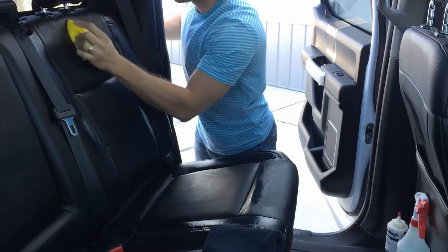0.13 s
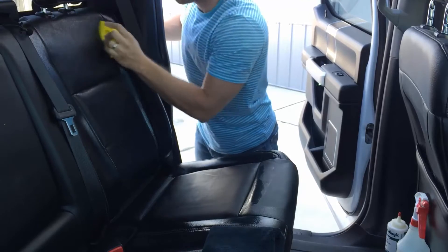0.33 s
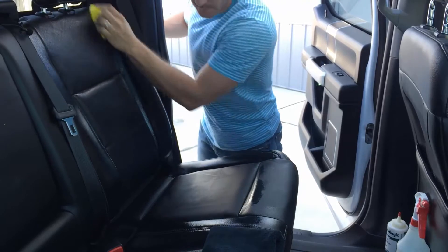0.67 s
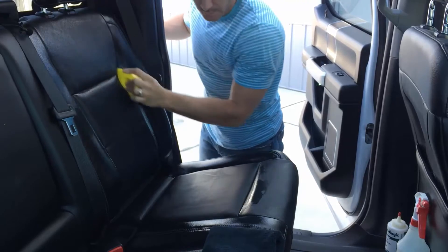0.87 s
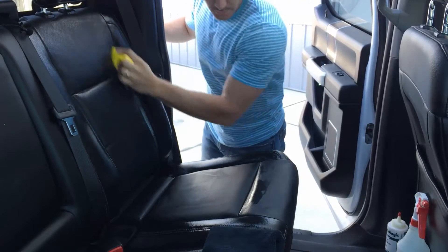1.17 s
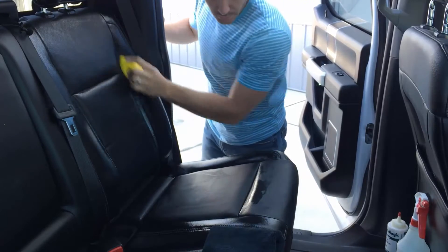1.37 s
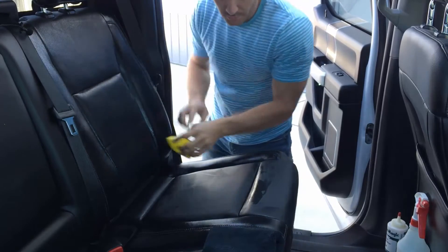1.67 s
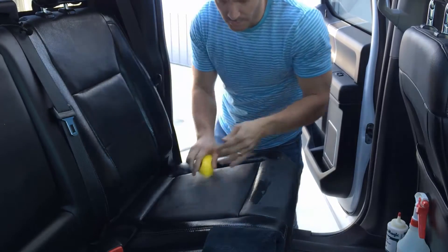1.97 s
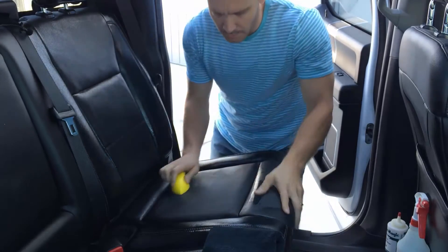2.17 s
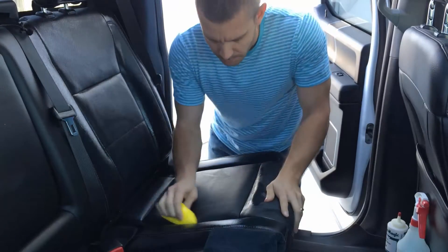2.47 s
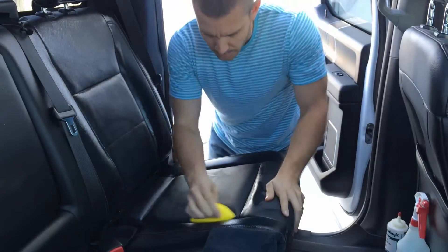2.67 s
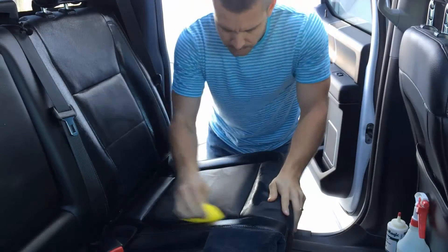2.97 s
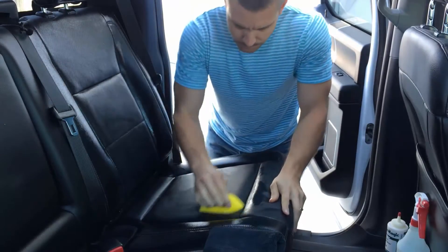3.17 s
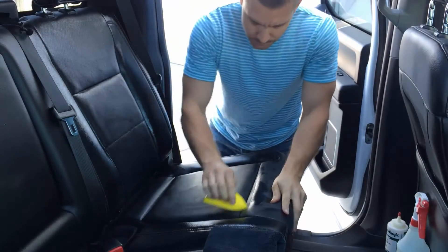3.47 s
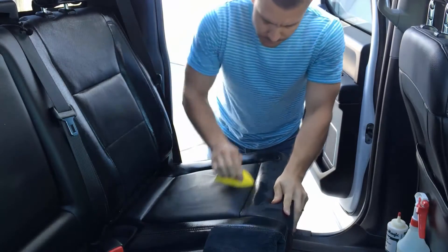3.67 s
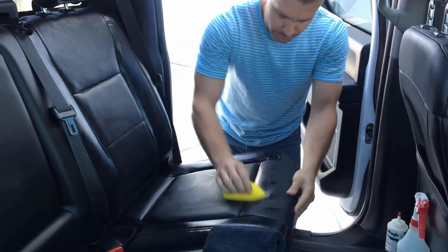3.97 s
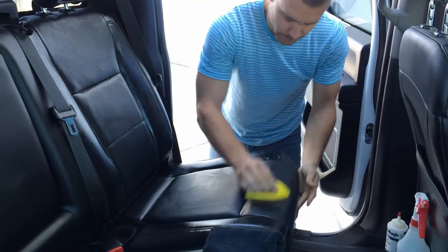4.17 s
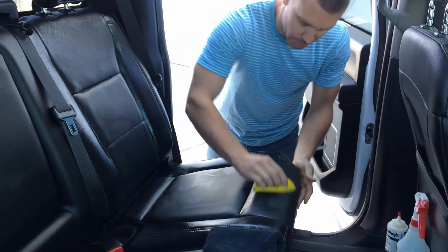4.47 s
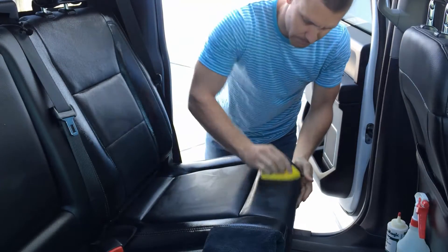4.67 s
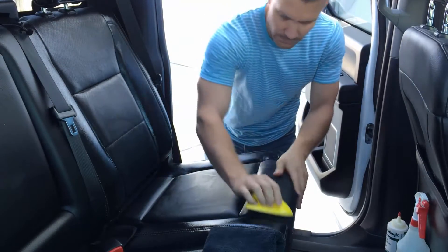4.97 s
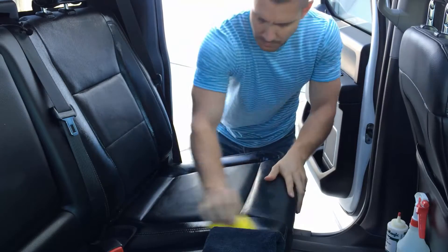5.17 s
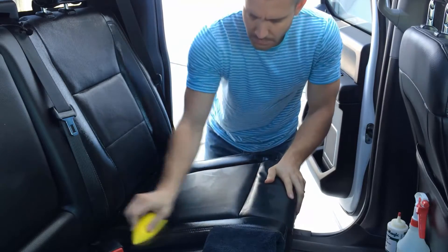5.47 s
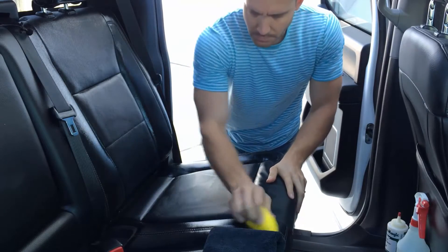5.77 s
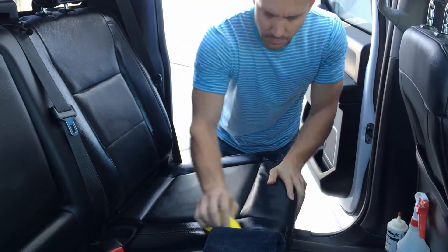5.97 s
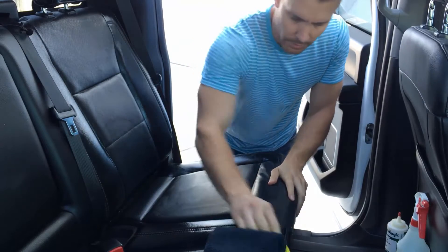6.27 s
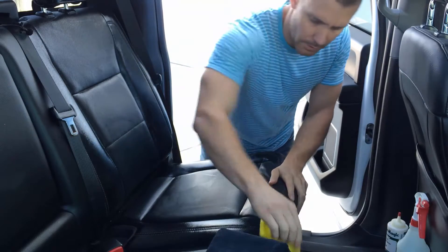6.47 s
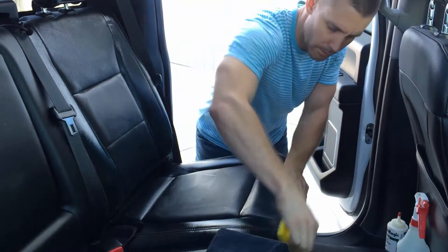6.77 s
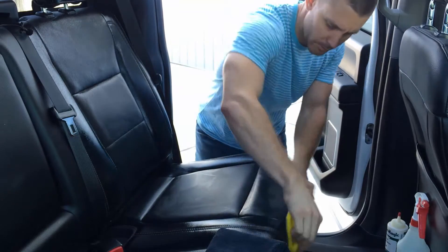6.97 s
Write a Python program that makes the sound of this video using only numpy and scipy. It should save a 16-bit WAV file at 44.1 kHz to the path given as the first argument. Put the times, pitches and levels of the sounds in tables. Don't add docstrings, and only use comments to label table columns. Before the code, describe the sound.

From 0 s a brush scrubs wet leather very close, bright and scratchy, dense bristle hiss over a soft padded rub. A solid thump and low rumble come at 0.1 s; strokes briefly stop at 0.47, 0.65, 1.08 and 1.3 s. Light trim taps tick near 0.55 and 1.2 s, then a loud knock cluster strikes at 1.44-1.51 s with a short groan. Brushing fades from 1.65 to 2.0 s, leaving faint bristle flicks. It resumes on the cushion, less crisp, with a heavy body rumble and tap at 2.2 s, and regular strokes until 5 s. A coarse, falling scrape drags over a seam at 4.3-4.6 s; a low moan sounds around 4 s. From 5 to 7 s strokes become short and wet along the edge, with hollow palm-pressed rubbing, faint groans near 5.6 s and dull knocks at 5.97 and 6.36 s. Dry cabin, faint air.

```python
import sys
import numpy as np
from scipy import signal
from scipy.fft import rfft, irfft
from scipy.io import wavfile
from scipy.ndimage import uniform_filter1d

SR = 44100
rng = np.random.default_rng(int(sys.argv[2]) if len(sys.argv) > 2 else 0)


def undo_db(level):
    steps = np.asarray(level, float) / 20
    return 10 ** steps


def dump(signal):
    limited = np.clip(np.atleast_2d(signal).T, -1, 1)
    pcm = np.round(limited * 32767).astype(np.int16)
    wavfile.write(sys.argv[1], SR, pcm)


N = 313992

# (frequency [Hz], level [dB per Hz])
RUB_COLOUR = [(1200, -61), (2100, -6.5), (2600, 5.5), (3700, 1.5), (4500, -11), (7000, -41)]
TIPS_COLOUR = [(4000, -29), (6000, -15.5), (7200, -7.5), (8500, -2.5), (10500, -1.5), (13000, 1.5),
               (14500, -5.5), (16000, -16)]
FILM_COLOUR = [(2500, -43), (3900, -6.5), (4500, -2), (5500, -1.5), (6500, -7.5), (8000, -10.5),
               (12000, -24)]
PAD_COLOUR = [(100, -2), (250, 0.5), (500, 0), (900, -0.5), (1500, -1.5), (2000, -1), (2600, -13.5),
              (5000, -92)]
# (frequency [Hz], level [dB per Hz])
HOLLOW_COLOUR = [(450, -28), (850, -1.5), (1600, 0.5), (2300, -3), (3500, -23)]
# (frequency [Hz], width [Hz], lift [dB])
BACK_MODES = [(582, 14, 6), (784, 25, -8.5), (1187, 11, 5), (1540, 43, 5), (1700, 55, 3.5), (2140, 23, 3),
              (2700, 100, -1.5), (3360, 51, 3), (3850, 140, 0.5)]
# (start [s], fastest [s], pressure [dB], bristle tips [dB], wet film [dB])
BACKREST_STROKES = [(0., 0.006, -45, 8, 5), (0.075, 0.093, -52, 9, 0), (0.159, 0.307, -47, 6, -5),
                    (0.493, 0.498, -46.5, 5.5, 0.5), (0.648, 0.792, -48, 7, -1),
                    (0.935, 1.005, -54, 5.5, 1.5), (1.068, 1.2, -46.5, 4, -1), (1.297, 1.416, -49, 6, -0.5),
                    (1.647, 1.7, -58.5, -8, -6), (1.764, 1.81, -63, -6, -9), (1.89, 1.95, -66.5, -10, -14)]
CUSHION_STROKES = [(2.007, 2.035, -55, 3.5, -2), (2.11, 2.25, -52.5, 5.5, -3), (2.283, 2.435, -47.5, 4, -3),
                   (2.518, 2.65, -47, 0, -3.5), (2.74, 2.828, -50.5, 3, -1), (2.934, 3.004, -46, -0.5, -4),
                   (3.094, 3.235, -48, -2, -4), (3.35, 3.426, -49.5, -1.5, -5),
                   (3.55, 3.692, -49.5, 1, -1.5), (3.787, 3.957, -48.5, 0.5, -2.5),
                   (4.144, 4.253, -49.5, -0.5, -5.5), (4.39, 4.493, -43.5, -2, -4),
                   (4.563, 4.68, -54.5, -1.5, -8.5), (4.755, 4.923, -52, 1.5, -5)]
EDGE_STROKES = [(5.048, 5.17, -46, -2.5, 4), (5.19, 5.295, -43.5, 0, 1.5), (5.403, 5.6, -48, 2.5, -0.5),
                (5.845, 5.93, -45.5, -0.5, -0.5), (5.98, 6.01, -46.5, -1.5, -3),
                (6.147, 6.267, -49.5, -0.5, -1), (6.35, 6.384, -51, -1, 2), (6.45, 6.47, -47, -5.5, 5.5),
                (6.533, 6.625, -49.5, -2, 2.5), (6.65, 6.69, -47, -1.5, 6), (6.74, 6.796, -47.5, -1, 0.5),
                (6.87, 6.93, -46.5, -6, 5.5), (6.95, 6.982, -50.5, -1.5, 0.5)]
# (backrest [dB], cushion [dB], edge [dB])
PLACE_PAD_DB = (2.5, -0.55, -1.34)
# (slowing [s], stopped [s], starting [s], moving again [s], drop [dB])
HAND_TURNS = [(.445, .464, .484, .491, -20), (.625, .647, .664, .677, -21),
              (1.06, 1.069, 1.091, 1.098, -21), (1.27, 1.298, 1.313, 1.319, -16),
              (1.975, 1.985, 2.016, 2.022, -12), (2.714, 2.726, 2.749, 2.775, -19),
              (2.884, 2.902, 2.919, 2.928, -19), (3.063, 3.09, 3.108, 3.137, -24),
              (3.33, 3.339, 3.381, 3.393, -10), (3.52, 3.53, 3.564, 3.575, -10),
              (3.787, 3.805, 3.837, 3.851, -9), (4.33, 4.35, 4.375, 4.4, -5),
              (4.57, 4.59, 4.603, 4.612, -9), (5.411, 5.425, 5.452, 5.454, -4),
              (6.426, 6.445, 6.457, 6.464, -16), (6.634, 6.644, 6.659, 6.667, -16),
              (6.73, 6.742, 6.752, 6.763, -13), (6.845, 6.861, 6.88, 6.894, -20),
              (6.945, 6.951, 6.965, 6.971, -14)]
# (middle [s], length [s], ring over the rubbing [dB])
PALM_PRESSES = [(0.097, 0.095, 3), (1.3, .3, -1), (2.175, 0.17, 1), (3.206, 0.23, -4), (3.359, 0.07, 9),
                (5.284, 0.33, -8), (5.737, 0.1, -1), (5.92, 0.091, -1.5), (6.067, 0.21, 3.5),
                (6.262, 0.16, 2.5), (6.487, .09, -6), (6.7, 0.08, -12)]
# (middle [s], level [dB])
BRISTLE_FLICKS = [(1.801, -56), (1.863, -58), (1.956, -57)]
# (time [s], level [dB])
LEANING = [(0.0, -31.5), (0.1, -20.5), (0.18, -24), (0.26, -31), (1.37, -28), (1.94, -37), (2.04, -30.5),
           (2.18, -29.5), (2.22, -18.5), (2.28, -21), (2.48, -24), (2.52, -30.5), (3.61, -31), (4.08, -36),
           (4.28, -31.5), (5.69, -40), (6.68, -33.5), (7.12, -30.5)]
# (frequency [Hz], level [dB per Hz])
SWAY_COLOUR = [(2, -9), (4, 19), (6, 27), (12, 23), (18, 31.5), (30, -38.5)]
RUMBLE_COLOUR = [(10, -12.5), (18, 4), (30, -2), (50, -8.5), (80, -11.5), (110, -29.5), (200, -89)]
BOOM_COLOUR = [(60, -5.5), (95, 1.5), (150, 1), (250, -14.5), (400, -17.5), (800, -48)]
# (frequency [Hz], level [dB per Hz])
AIR_COLOUR = [(100, -20), (300, 0), (600, -2), (1800, -7), (2500, -14), (4000, -19), (6000, -25),
              (15000, -25)]
# (frequency [Hz], time to fall 60 dB [s])
CABIN_ECHO = [(200, 0.22), (1000, 0.11), (8000, 0.033)]
# (frequency [Hz], level [dB], time to fall 60 dB [s])
PANEL_MODES = [(128, 0, 0.15), (272.2, 8.5, 0.11), (410, -5.5, 0.2), (493, 8, 0.02), (633, 9, 0.055),
               (787, 14, 0.03), (1025, 4.5, 0.038), (1087, 1, 0.07), (1337, -1, 0.03)]
# (time [s], peak [dB], hardness [dB], pitch factor [1])
TRIM_TAPS = [(0.516, -30.5, -20, 1.25), (.544, -27, -9, 1.15), (.586, -31.5, -20, 1.25),
             (1.201, -26, -24, 1.07), (1.213, -28.5, -22, .84), (1.228, -31.5, -21, 1.16),
             (1.249, -34, -27, 0.91), (1.364, -29, -25, .75), (1.44, -11, -45, 1.002),
             (1.47, -13.5, -13, 1.002), (1.5025, -7, -4, 1.002), (1.514, -18, 14, 0.84),
             (1.565, -27.5, -21, 0.74), (2.102, -43, 3, .7), (2.2, -35, 11, 0.75), (2.22, -19, -10, 1.1),
             (2.296, -29.5, -9, 0.82), (2.358, -34, -2, 0.74), (2.421, -32, -32, 1.01),
             (3.132, -38, -8, 1.12), (4.303, -25.5, -2, 0.83), (4.315, -30, -18, .75),
             (5.527, -39.5, -6, 0.85), (6.815, -31.5, -22, 0.72)]
# (time [s], peak [dB], hardness [dB], pitch factor [1])
FRAME_THUMPS = [
    (.091, -23.5, -2.5, 1.11),
    (.1, -29.5, -14, 1.21),
    (1.097, -27, -19, .67),
    (5.971, -30, -8, 1.05),
    (6.274, -35.5, -20, 0.78),
    (6.361, -26, -6, .75),
    (6.375, -30, -6, .7),
]
# (middle [s], signed swing [full scale], rate [Hz], length [s])
SPRING_ROCKS = [
    (0.842, -0.38, 3.24, 1.23),
    (1.447, 0.14, 3.4, 0.58),
    (1.786, -0.17, 4.1, 0.35),
    (2.04, 0.2, 5.6, 0.19),
    (2.238, -0.22, 4, 0.29),
    (2.486, 0.2, 3.2, 0.36),
    (6.617, 0.12, 3.8, 0.38),
]
# (start [s], length [s], pitch [Hz], level [dB])
FRAME_MOANS = [
    (3.9, .45, 79.5, -39),
    (5.56, .15, 229, -46.5),
    (3.7, .06, 390, -50),
    (5.26, .07, 410, -52),
    (5.97, 0.11, 78.4, -37),
    (1.095, .04, 110, -31.5),
    (1.5, 0.13, 138.3, -32),
    (1.3, .14, 150, -37),
    (6.35, 0.06, 133, -38),
    (5.6, 0.23, 70.6, -39.5),
]
# (start [s], hardest [s], end [s], level [dB], starting colour [Hz])
SEAM_SCRAPES = [
    (4.291, 4.306, 4.35, -37, 1700),
    (4.389, 4.486, 4.6, -30, 1740),
]
# (frequency [Hz], level [dB per Hz])
SCRAPE_COLOUR = [(200, -7), (500, 5.5), (1300, 4.5), (3500, 7), (4600, -6), (8000, -42)]


def evened(x):
    return x / np.sqrt(np.mean(x ** 2) + 1e-20)


def read(points, hz):
    f, value = np.transpose(points)
    return np.interp(np.log(hz + .1), np.log(f + .1), value)


def coloured(x, points, modes=()):
    hz = np.fft.rfftfreq(len(x), 1 / SR)
    db = read(points, hz)
    for f, width, lift in modes:
        db = db + lift / (1 + (2 * (hz - f) / width) ** 2)
    return evened(irfft(rfft(x) * undo_db(db), len(x)))


def flutter(ms):
    size = max(int(ms * SR / 1000), 1)
    smooth = uniform_filter1d(rng.standard_normal(N), size)
    return evened(uniform_filter1d(smooth, size))


def patchy(x, patchy_db):
    z = signal.stft(x, nperseg=512)[2]
    patches = uniform_filter1d(rng.standard_normal(z.shape), size=3, axis=0)
    patches = uniform_filter1d(patches, size=14, axis=1)
    return evened(signal.istft(z * undo_db(patchy_db * evened(patches)), nperseg=512)[1][:N])


def steady(x, ms):
    power = abs(uniform_filter1d(x ** 2, int(ms * SR / 1000)))
    return evened(x / np.sqrt(power + 0.1))


def bump(s, length):
    return np.cos(np.pi * np.clip((np.arange(N) / SR - s) / length, -.5, .5)) ** 2


def resonate(x, hz, width_hz):
    spin = np.exp(2j * np.pi * np.cumsum(hz) / SR)
    r = np.exp(-np.pi * width_hz / SR)
    return 2 * (spin * signal.lfilter([1 - r], [1, -r], x / spin)).real


def add(mix, s, sound):
    part = mix[max(round(s * SR), 0):][:len(sound)]
    part += sound[:len(part)]


def strokes():
    sag_db, sag_curve, full_swing_s, blend_s = 9.5, 1.39, 0.11, 0.051
    tips_hold, film_hold, pad_hold = 0.23, .2, 0.18
    places = (BACKREST_STROKES, CUSHION_STROKES, EDGE_STROKES)
    rows = np.array([row + (pad,) for place, pad in zip(places, PLACE_PAD_DB) for row in place])
    t = np.arange(N) / SR
    now = np.searchsorted(rows[1:, 0], t)
    start, fastest, *parts = rows[now].T
    end = np.append(rows[1:, 0], N / SR)[now]
    half = abs(np.where(t < fastest, start, end) - fastest) + 1e-3
    sag = sag_db * np.tanh(half / full_swing_s) * (abs(t - fastest) / half) ** sag_curve
    shares = np.array([-1, tips_hold, film_hold, pad_hold])[:, None]
    return uniform_filter1d(parts + shares * sag, int(blend_s * SR), axis=1, mode="nearest")


def brush(slips_per_s=26000, spread_db=.6, clump_db=.5, flick_s=0.049):
    rub_db, tips_db, film_db, pad_db = strokes()
    t = np.arange(N) / SR
    turn_db = sum(np.interp(t, row[:4], [0, 1, 1, 0]) ** 1.6 * row[4] for row in HAND_TURNS)
    slips = (rng.random(N) < slips_per_s / SR) * rng.standard_normal(N)
    slips = slips * undo_db(spread_db * np.minimum(rng.exponential(1, N), 4) + clump_db * flutter(4.3))
    slips = patchy(slips, 1.8)

    tips = coloured(slips, TIPS_COLOUR)
    film = coloured(slips, FILM_COLOUR)
    tops = undo_db(film_db - 1.35) * film + undo_db(tips_db - 0.36) * tips
    flicks = sum(undo_db(db) * bump(s, flick_s) for s, db in BRISTLE_FLICKS) * tips

    pressed = sum(undo_db(db) * bump(s, length) for s, length, db in PALM_PRESSES)
    strong_modes = [(f, width, 2.8 * lift) for f, width, lift in BACK_MODES]
    back = pressed * coloured(slips, HOLLOW_COLOUR, strong_modes)

    pad_db = pad_db + 0.5 - 0.52 * turn_db + 0.36 * flutter(14.0)
    pad = undo_db(pad_db) * coloured(slips, PAD_COLOUR, BACK_MODES)
    rub = undo_db(-1.84) * coloured(slips, RUB_COLOUR, BACK_MODES)
    return undo_db(rub_db + 1.02 * turn_db) * (rub + tops + pad + back) + flicks


def body(lumps_db=2.5):
    s, db = np.transpose(LEANING)
    lean_db = np.interp(np.arange(N) / SR, s, db)
    rumble_db = 1.5 + lean_db
    boom_db = -47 + 0.65 * (lean_db - lean_db.mean())
    sway = coloured(rng.standard_normal(N), SWAY_COLOUR)
    rumble = coloured(rng.standard_normal(N), RUMBLE_COLOUR)
    boom = coloured(rng.standard_normal(N), BOOM_COLOUR)
    boom = undo_db(boom_db + lumps_db * flutter(26.0)) * steady(boom, 63.0)
    shake = undo_db(2.5) * steady(sway, 340.0) + steady(rumble, 90.)
    return undo_db(rumble_db) * shake + boom


def outdoor_air(level_db=-61):
    return undo_db(level_db) * coloured(rng.standard_normal(N), AIR_COLOUR)


def cabin(x):
    hz, t, z = signal.stft(rng.standard_normal(SR // 3), SR, nperseg=256)
    t60 = np.maximum(read(CABIN_ECHO, hz), .02)[:, None]
    tail = signal.istft(z * undo_db(-60 * t / t60), SR, nperseg=256)[1]
    return signal.fftconvolve(x, tail / np.linalg.norm(tail))[:N]


def knocks(tap_thud_db=-16, thump_thud_db=8.5):
    out, t = np.zeros(N), np.arange(SR // 4) / SR
    hz, db, t60 = np.transpose(PANEL_MODES)[:, :, None]
    rows = [row + (tap_thud_db,) for row in TRIM_TAPS]
    rows += [row + (thump_thud_db,) for row in FRAME_THUMPS]
    detune = rng.uniform(0.96, 1.04, (len(rows), len(PANEL_MODES), 1))
    blow = np.sin(np.pi / 2 * np.minimum(t / .003, 1)) ** 2 * (.2 + np.exp(-t / .007))
    for (s, peak_db, hard_db, pitch, thud_db), d in zip(rows, detune):
        ring = np.clip(0.7 + 0.02 * hard_db, .3, 1.1)
        gains = undo_db(db + hard_db * (hz > 350) + thud_db * (hz < 200) - 60 * t / (t60 * ring))
        sound = (gains * np.sin(2 * np.pi * hz * pitch * d * t)).sum(0) * blow
        add(out, s, undo_db(peak_db) * sound / abs(sound).max())
    return out


def frame(moan_sharpness=14):
    out = np.zeros(N)
    for s, swing, hz, length in SPRING_ROCKS:
        t = np.arange(-length / 2, length / 2, 1 / SR)
        add(out, s - length / 2, swing * np.cos(2 * np.pi * hz * t) * np.hanning(len(t)) ** .5)
    for s, length, hz, db in FRAME_MOANS:
        size = round(length * SR)
        moan = resonate(rng.standard_normal(SR // 2), np.full(SR // 2, hz), hz / moan_sharpness)
        moan = evened(moan[-size:])
        add(out, s, undo_db(db) * moan * signal.windows.tukey(size, .4))
    return out


def scrape(catches_per_s=5000, ends_db=-28.5, sink=0.91):
    out = np.zeros(N)
    modes = [(f, width, 2.07 * lift) for f, width, lift in BACK_MODES]
    for start, hardest, end, db, top_hz in SEAM_SCRAPES:
        t = np.arange(start, end, 1 / SR)
        catches = (rng.random(SR // 2) < catches_per_s / SR) * rng.standard_normal(SR // 2)
        ringing = patchy(coloured(catches, SCRAPE_COLOUR, modes), 3.2)[:len(t)]
        hz = top_hz * (1 - sink * ((t - start) / (end - start)) ** 1.6)
        sinking = resonate(resonate(ringing, hz, 1350), hz, 1350)
        drag = steady(sinking + 0.34 * ringing * hz / top_hz, 25.)
        fade_db = ends_db * np.interp(t, [start, hardest, end], [1, 0, 1]) ** 2
        add(out, start, undo_db(db + fade_db) * drag)
    return out


def scene():
    near = brush() + scrape()
    hits = knocks()
    echo = cabin(undo_db(-31) * near + undo_db(-13) * hits)
    return (near + hits + echo + body() + frame() + outdoor_air())[None]


def low_pass(x):
    return signal.sosfilt(signal.butter(12, 15600, fs=SR, output="sos"), x)


def record(dry):
    edge = signal.firwin(801, 15350, window=("kaiser", 9), fs=SR)
    padded = np.pad(dry, [(0, 0), (400, 400)], "edge")
    limited = signal.oaconvolve(padded, edge[None], "valid")
    return low_pass(limited)


dry = scene()
out = record(dry)
dump(out)
```